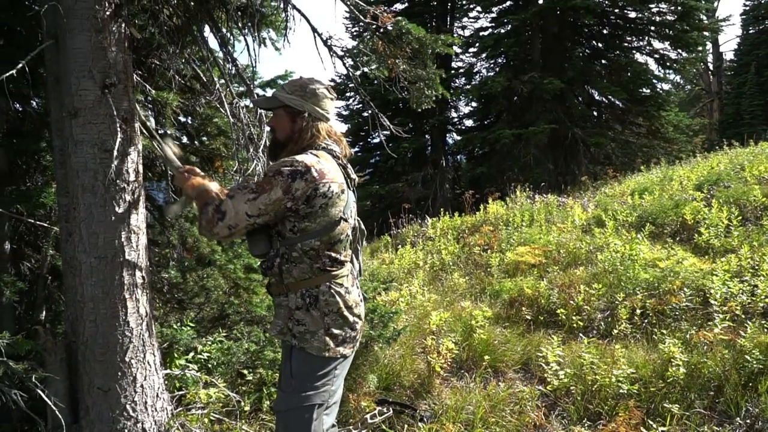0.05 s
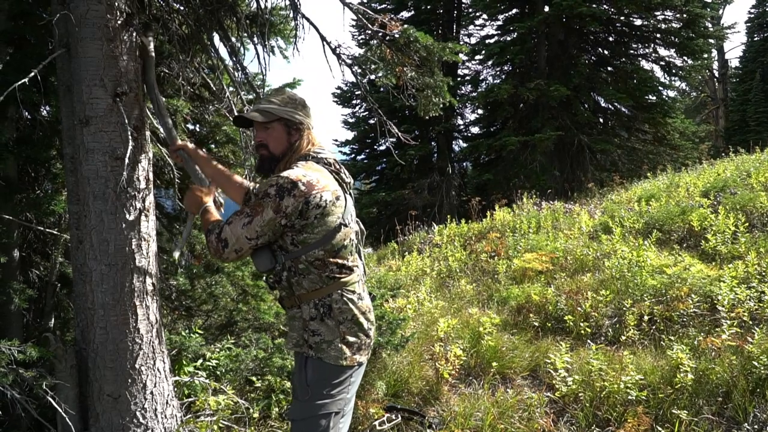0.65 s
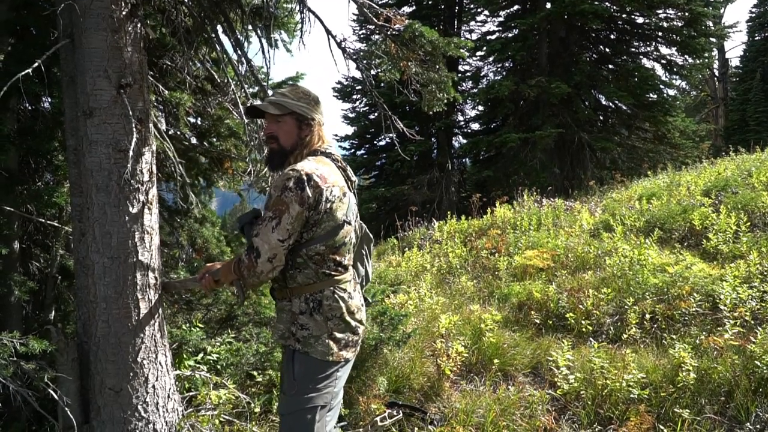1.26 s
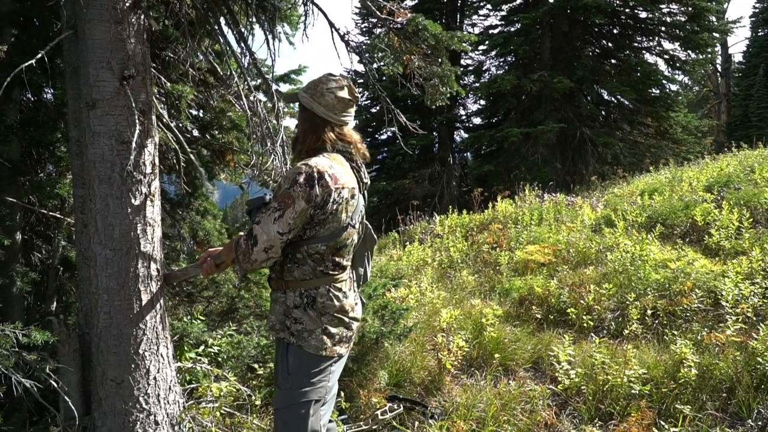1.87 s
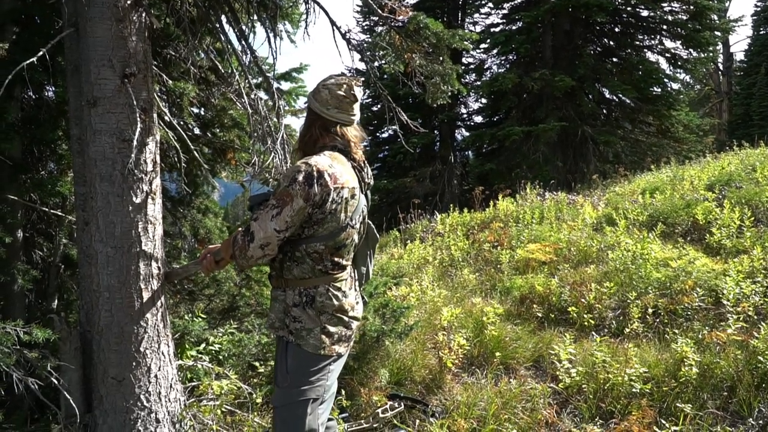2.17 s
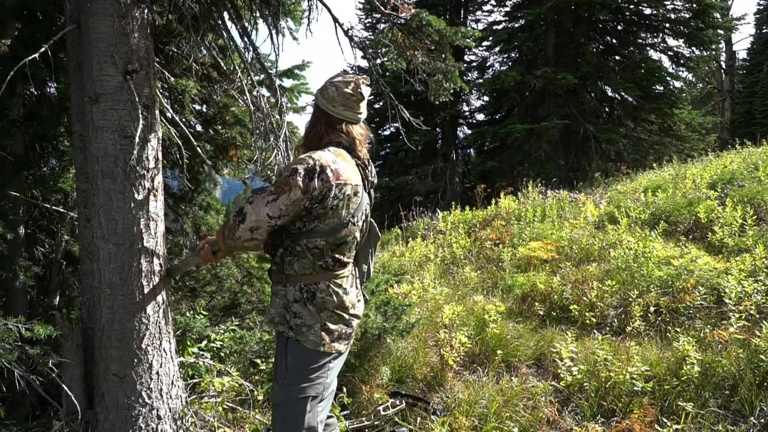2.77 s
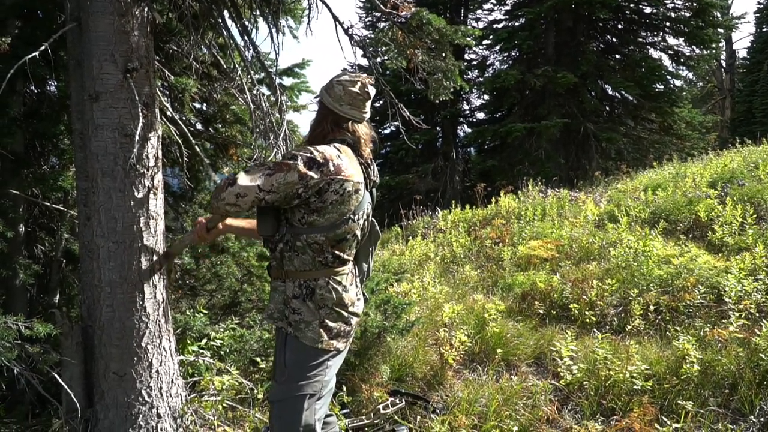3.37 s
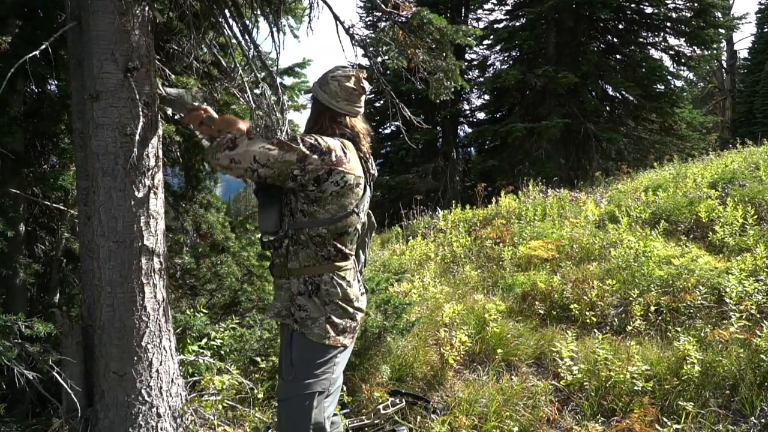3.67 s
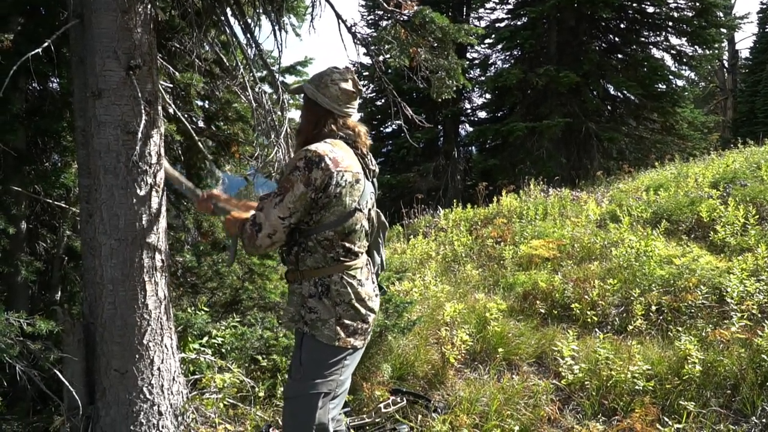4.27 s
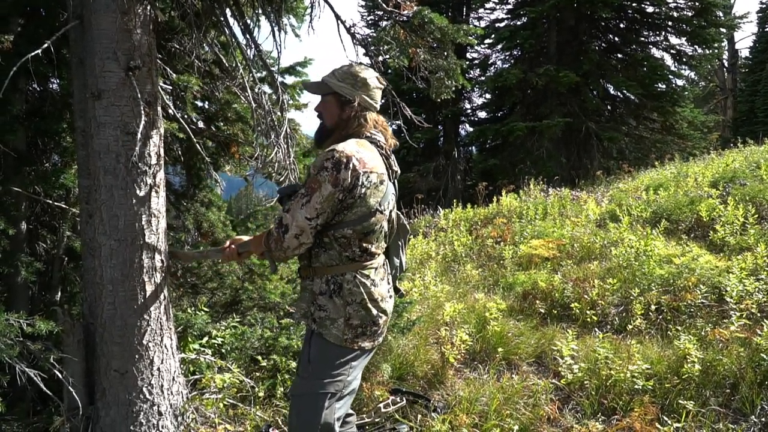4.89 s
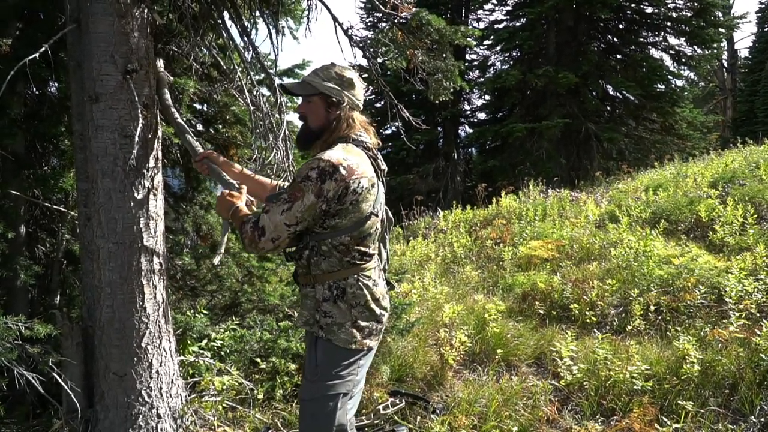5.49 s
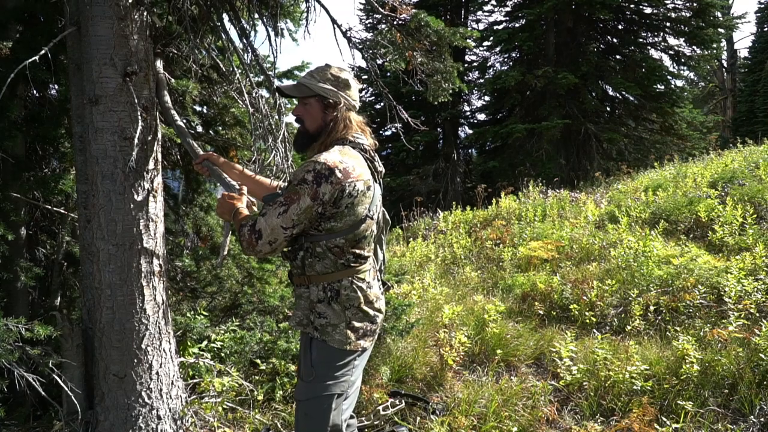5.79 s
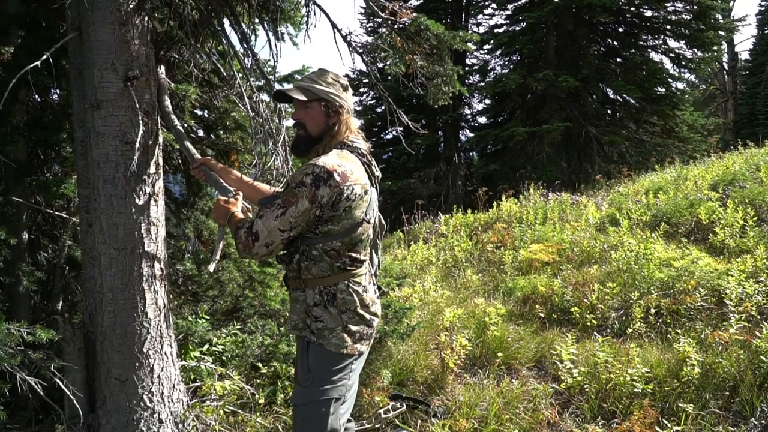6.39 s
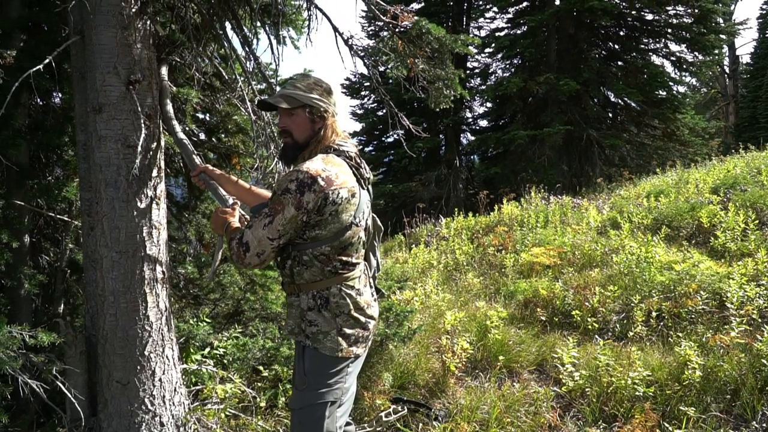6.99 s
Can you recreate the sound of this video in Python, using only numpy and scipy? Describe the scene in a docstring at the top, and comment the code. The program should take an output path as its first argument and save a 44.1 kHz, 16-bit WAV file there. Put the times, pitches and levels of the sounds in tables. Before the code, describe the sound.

A dry stick rasps up and down a tree trunk, crushing bark and snapping small dead twigs. After two loud crackling strokes it eases to light rustling and a wooden knock, then scrapes hard again with a cluster of knocks and ends on a sharp jab. A small bird gives a few faint chips near the end. It is heard from a few metres away in a quiet forest with a soft echo.

```python
"""A faint forest hush and, at once, the rasp of a dry stick raked up and down a conifer trunk.
The stick crushes bark, catches on ridges, snaps dead twigs and is jabbed into the trunk.
Now and then a side knock rings it in the hand, and the trunk shudders under a heavy push.
The trees answer faintly; a small bird gives a few thin chips near the end. Mono, a few metres away."""
import sys
import numpy as np
from scipy import signal
from scipy.fft import rfft, irfft, next_fast_len
from scipy.io import wavfile
from scipy.ndimage import map_coordinates

SR = 44100
rng = np.random.default_rng(int(sys.argv[2]) if len(sys.argv) > 2 else 0)


def log_audio(samples):
    """Write samples as a 16-bit WAV file to the path given in sys.argv[1]."""
    # one column per channel
    frames = np.atleast_2d(samples).T
    # limit to full scale, then quantise
    limited = np.clip(frames, -1, 1)
    pcm = np.round(limited * 32767).astype(np.int16)
    wavfile.write(sys.argv[1], SR, pcm)


N = 319284


def amp(db):
    return 10 ** (np.asarray(db) / 20)


def unit_rms(x):
    return x / np.sqrt(np.mean(x ** 2) + 1e-20)


def curve(points, hz):
    """Interpolate (Hz, value) points on a log frequency axis."""
    point_hz, values = np.transpose(points)
    return np.interp(np.log(hz + 1), np.log(point_hz + 1), values)


def add(track, start_s, x):
    part = track[max(round(start_s * SR), 0):][:len(x)]
    part += x[:len(part)]


def wobble(rate_hz, size):
    """Smooth random curve, rate_hz knots a second."""
    knots = rng.standard_normal(int(size * rate_hz / SR) + 4)
    return map_coordinates(knots, [np.arange(size) * rate_hz / SR])


def filtered(x, gain):
    """Minimum-phase filter with magnitude gain(hz)."""
    n_fft = 2 * next_fast_len(len(x) // 2 + 2048)
    cepstrum = irfft(np.log(np.maximum(gain(np.fft.rfftfreq(n_fft, 1 / SR)), 1e-6)))
    cepstrum[1:n_fft // 2] *= 2
    cepstrum[n_fft // 2 + 1:] = 0
    return irfft(rfft(x, n_fft) * np.exp(rfft(cepstrum)), n_fft)[:len(x)]


def resonance(hz, centre_hz, width_hz):
    return 1 / (1 + (2 * (hz - centre_hz) / width_hz) ** 2)


# Hush spectrum: (frequency [Hz], density [dB])
AIR_SPECTRUM = [(25, -20), (100, -14), (160, -11), (360, -10.5), (670, -8), (920, -9.5), (1240, -12.5),
                (1850, -19), (6000, -25), (11000, -24), (15500, -24)]


def air():
    """Faint, even forest hush."""
    hush = filtered(rng.standard_normal(N), lambda hz: amp(curve(AIR_SPECTRUM, hz)))
    return amp(-66 + 0.4 * wobble(3.6, N)) * unit_rms(hush)


# Breaking bark: (frequency [Hz], density [dB])
BARK_SPECTRUM = [(29, -64), (50, -29), (196, -8.5), (444, -7.5), (551, -5.5), (771, -6.5), (981, -4),
                 (1080, -5.5), (1620, -8.5), (1880, -6.5), (2890, -7), (3670, -6), (5020, -17),
                 (7370, -19.5), (15500, -30)]
# Scraped-stick resonances: (centre [Hz], width [Hz], level [dB])
WOOD_RESONANCES = [(534, 110, -7.5), (977, 60, -7.5), (1286, 54, -6), (1800, 160, -15), (3700, 1600, -14)]


def wood_gain(hz):
    """Colour of breaking bark, heard through the stick."""
    peaks = sum(amp(db) * resonance(hz, centre, width) for centre, width, db in WOOD_RESONANCES)
    return amp(curve(BARK_SPECTRUM, hz)) * (1 + peaks)


def fractures(size):
    """Tiny random breaks in the bark, many small and a few large, over dry hiss."""
    breaking = rng.random(size) < 1300 / SR
    strength_db = 3 * np.minimum(rng.exponential(size=size), 3.5)
    breaks = breaking * rng.choice([-1, 1], size) * amp(strength_db)
    return unit_rms(breaks) + 0.65 * rng.standard_normal(size)


# Slides over bark and needles:
# (start [s], hold [s], level [dB], rise [s per 20 dB], fall [s per 20 dB], body [dB], fizz [dB])
STROKES = [(0.026, 0.063, -49.5, 0.02, .1, -7, -4.5), (0.134, 0.092, -34, .08, 0.16, -8.5, -7),
           (0.354, .34, -56, .1, .2, -2, -3.5), (0.802, 0.24, -38, 0.11, 0.14, -2, -6),
           (1.173, .1, -54, 0.062, .22, 3, -3.5), (1.4, .2, -71, .2, 0.34, 7.5, 2.5),
           (1.848, .1, -65, 0.29, .35, -9, -7.5), (2.152, 0.094, -62, 0.017, .15, -3, -7.5),
           (2.249, 0.15, -75, 0.077, 0.5, 11, 4), (2.6, 0.5, -76, 0.33, 0.41, 1.5, -2),
           (3.393, 0.24, -54.5, .06, 0.098, -7, -3.5), (3.756, 0.039, -36.5, 0.065, .19, -4.5, -2.5),
           (4.09, .08, -55.5, 0.11, .1, 0.5, -3), (4.194, 0.1, -51, .05, .05, 2.5, -22.5),
           (4.374, 0.037, -43, 0.21, 0.3, -6, -0.5), (4.756, 0.53, -69.5, 0.17, 0.082, 4, 3.5),
           (5.26, 0.093, -43.5, 0.11, 0.1, -4.5, -4.5), (5.377, 0.091, -50, .05, .06, 4, -15.5),
           (5.476, 0.14, -67.5, 0.054, 0.5, 9, -1.5), (5.797, 0.49, -77.5, 0.13, 0.16, 5.5, 2)]


def stroke_gains(t, stall_s=0.014, stall_db=-7):
    """Body, crackle and fizz gains: strokes swell, hold, fade, and stall just before a catch."""
    power = np.zeros((3, len(t)))
    for start_s, hold_s, db, rise_s, fall_s, body_db, fizz_db in STROKES:
        fade = np.maximum(start_s - t, 0) / rise_s + np.maximum(t - start_s - hold_s, 0) / fall_s
        envelope = amp(db - 20 * np.minimum(fade, 10))
        power += np.outer(amp([body_db, 0, fizz_db]), envelope) ** 2
    catch_s = np.sort([start_s for start_s, *_ in CATCHES] + [np.inf])
    wait_s = catch_s[np.searchsorted(catch_s, t)] - t
    return np.sqrt(power) * amp(stall_db * np.exp(-(wait_s / stall_s) ** 2))


def rub(clump_db=2, grit_db=0.4):
    """The sliding stick crushes bark in uneven clumps; three bands follow the strokes."""
    crumbs = amp(clump_db * wobble(70, N) + grit_db * wobble(240, N)) * fractures(N)
    edges_hz = [40, 1400, 4600, 20000]
    out = np.zeros(N)
    for gain, low_hz, high_hz in zip(stroke_gains(np.arange(N) / SR), edges_hz, edges_hz[1:]):
        def band_gain(hz):
            return wood_gain(hz) / np.sqrt((1 + (low_hz / (hz + 1)) ** 10) * (1 + (hz / high_hz) ** 10))
        out += gain * unit_rms(filtered(crumbs, band_gain))
    return out


def flakes(count=420, level_db=4.5):
    """Loose flakes and twiglets tick at their own pitches, scaled by the rubbing that shakes them."""
    out, t = np.zeros(N), np.arange(SR // 30) / SR
    times_s = rng.random(count) * N / SR
    for start_s, shake in zip(times_s, stroke_gains(times_s)[1]):
        pitch, size, life = rng.standard_normal(3)
        hz = 1600 * np.exp(0.42 * np.clip(pitch, -2, 2))
        t60_s = 0.047 * np.exp(0.39 * life)
        tick = np.sin(2 * np.pi * hz * t) * amp(level_db + 3 * size - 60 * t / t60_s)
        add(out, start_s, shake * tick)
    return out


def contact(force, ring_hz, ring_db, firm_db, fizz_db):
    """Colour one contact: firmer pressure brings out the low wood and damps the ringing piece."""
    thud_db, hollow_db = 0.81 * firm_db, 0.22 * firm_db
    shape_db = [(280, thud_db), (520, hollow_db), (1100, hollow_db), (1800, 0.0063),
                (3900, 0.37 * fizz_db), (5600, fizz_db), (14000, 1.5 * fizz_db)]
    # each spot on the stick favours other small resonances
    spot_db = 2.8 * rng.standard_normal(60)

    def gain(hz):
        ripple_db = np.interp(hz, np.geomspace(350, 8000, len(spot_db)), spot_db, left=0, right=0)
        piece = amp(ring_db - 0.16 * firm_db) * resonance(hz, ring_hz, 0.23 * ring_hz)
        return wood_gain(hz) * amp(curve(shape_db, hz) + ripple_db) * (1 + piece)
    return unit_rms(filtered(force, gain))


def slips(size, rate_hz=170):
    """Hard slips at uneven intervals."""
    slip_count = np.floor(np.cumsum(rate_hz * np.exp(0.5 * wobble(200, size))) / SR)
    return unit_rms(np.diff(slip_count, prepend=0) * np.exp(0.5 * rng.standard_normal(size)))


# Catches on ridges: (time [s], length [s], level [dB], ring [Hz], firmness [dB], fizz [dB])
CATCHES = [(.037, .012, -43, 1406, -16.5, 2), (0.094, .013, -31.5, 2230, -17, 7),
           (0.11, .026, -29.5, 2380, -9, 8), (.147, .016, -26.5, 616, -8, 6),
           (0.169, 0.017, -23.5, 2270, -5.5, 1), (0.188, .025, -23, 546, 8, -2.5),
           (0.288, .027, -32, 1120, -20, -1), (0.531, 0.03, -44.5, 710, -9.5, -10.5),
           (.808, 0.021, -30, 1040, -5, -7.5), (0.865, 0.035, -33, 2480, -2.5, -9),
           (0.902, 0.021, -21.5, 1020, -16, -11.5), (0.922, 0.021, -19.5, 1270, -13, -11.5),
           (0.967, 0.0092, -26, 1340, 0, -3.5), (0.988, 0.0075, -28, 2300, 6, -1.5),
           (1.023, 0.015, -28, 3980, 3, -3.5), (1.046, .03, -36, 659, -10.5, 6),
           (1.161, 0.011, -44, 2030, -13, 6), (1.201, .011, -41.5, 1250, -13.5, -1.5),
           (3.44, 0.028, -39, 3730, -5.5, 6), (3.469, 0.0089, -35.5, 2200, 13.5, -3),
           (3.5, 0.012, -32, 3920, 10.5, -2), (3.54, 0.018, -36, 504, 9.5, -5.5),
           (3.599, 0.03, -43.5, 730, 10.5, 5), (3.666, .014, -30, 544, 4, 3),
           (3.713, .014, -29.5, 640, 9, -2), (3.728, 0.013, -21, 1900, -1.5, -2),
           (3.743, .014, -24.5, 1990, -2.5, -3.5), (4.26, .014, -34, 1390, -4, -1),
           (4.284, 0.013, -36.5, 1009, 10, 1.5), (4.325, .015, -35, 3624, 9.5, 6),
           (4.351, .024, -32, 990, 10, -4), (4.392, 0.016, -29.5, 4000, 2, -3),
           (4.428, .01, -28, 1230, 8.5, -1.5), (4.451, .012, -29.5, 1930, 13.5, -0.5),
           (4.472, 0.03, -35, 535, 14, -4.5), (4.526, 0.0072, -30.5, 567, 18.5, -2),
           (4.553, .014, -35.5, 3984, -8, 6.5), (4.579, 0.036, -38.5, 3700, -8, 2),
           (5.454, 0.016, -39.5, 650, 23.5, 1), (6.087, .02, -55.5, 5500, -18, 2.5)]


def catches(ring_db=5, slip_db=-4.5):
    """The stick grips, then tears loose in a dense, fading run of slips."""
    out, t = np.zeros(N), np.arange(SR // 10) / SR
    for start_s, length_s, db, ring_hz, firm_db, fizz_db in CATCHES:
        decay_db = -3 * t / length_s - 60 * np.maximum(t - length_s, 0) / 0.039
        envelope = (1 - np.exp(-t / 0.0012)) * amp(decay_db)
        crunch = fractures(len(t)) * amp(1.5 * wobble(260, len(t)))
        judder = crunch + amp(slip_db) * slips(len(t))
        tear = contact(envelope * judder, ring_hz, ring_db, firm_db, fizz_db)
        add(out, start_s, amp(db) * tear * np.sqrt(length_s * SR / len(t)))
    return out


def splinters(count=100, middling_db=-50):
    """Small chance breaks, louder where the stick slides harder; rows as in SNAPS."""
    times_s = (np.arange(count) + rng.random(count)) / count * N / SR
    size, pitch, firmness = np.clip(rng.standard_normal((count, 3)), -2, 2).T
    pressure_db = 20 * np.log10(stroke_gains(times_s)[1]) - middling_db
    db = -44.5 + 0.85 * pressure_db + 5 * size
    return list(zip(times_s, db, 1940 * np.exp(0.45 * pitch), 6 * firmness, np.zeros(count)))


# Breaking twigs and bark: (time [s], relative level [dB], ring [Hz], firmness [dB], fizz [dB])
SNAPS = [(.128, -24.5, 2553, 1, 9), (.1485, -25, 3006, 2, 7.5), (.1787, -26.5, 2480, 0, 2),
         (.1938, -25.5, 599, 4, 1.5), (.22, -26.5, 1936, 0, 10.5), (.3062, -25.5, 1660, -21, -3),
         (.2653, -17.5, 691, 9, -9), (.3918, -41, 1225, -17, 4.5), (.4255, -41, 1800, -15, 0),
         (.5882, -38, 3480, -2, 2), (.6692, -40, 1276, -4, -3), (.7461, -41.5, 4000, -29, 0.5),
         (.8457, -22.5, 3787, -2, 4), (.8682, -29, 2490, 0, -4), (.9027, -13.5, 1184, -11, -11.5),
         (.9296, -17, 1440, -16.5, -11), (1.0906, -28, 2446, -20, 12.5), (1.2447, -35, 1272, -20, 11),
         (1.3782, -53, 1400, 4, -3), (1.8775, -57, 1900, 9, -8), (1.9647, -59, 1900, 3, -8),
         (2.2712, -48, 2460, 9, -12), (2.6942, -55.5, 4070, -3, -6), (2.7745, -53.5, 1690, 11, -10.5),
         (2.838, -55.5, 1790, 17, -6), (2.865, -56.5, 2400, 12, -8), (2.909, -57, 1715, 4, -10),
         (3.3964, -32.5, 3400, -9.5, 5), (3.4978, -26.5, 4040, -1, -5), (3.554, -32, 2120, 12, -4.5),
         (3.7154, -33, 1802, 8, -5), (3.7432, -17, 2110, -6, -2.5), (3.9141, -29.5, 3207, -22, 11),
         (4.244, -30, 1470, -12, -5.5), (4.419, -31.5, 2250, 19, -5), (4.5246, -26, 533, 8, -1),
         (4.5789, -29, 3290, -5, 7), (4.602, -33.5, 2050, 5, -9.5), (4.7718, -48, 1170, -15, 16.5),
         (5.1474, -31.5, 2883, -32, 8), (5.36, -22, 1166, -41, -12), (5.3703, -24, 1378, -16, -12),
         (5.3827, -16.5, 3200, 11.5, 0.5), (5.4189, -30, 2153, 13, -17.5), (5.4497, -27, 1800, 11, 0.5),
         (5.5656, -45.5, 1330, -29, -30), (5.792, -52.5, 3630, 12, 7.5), (6.0475, -43, 5343, -30.5, 6),
         (6.0843, -45.5, 2685, -18.5, 6)]


def snaps(ring_db=9.5, trim_db=-10.5):
    """Each piece breaks with one sharp impulse and a short spray of splinters."""
    out, t = np.zeros(N), np.arange(SR // 20) / SR
    envelope = 0.24 * amp(-60 * t / 0.011) + 0.025 * amp(-60 * t / 0.03)
    for start_s, db, ring_hz, firm_db, fizz_db in list(SNAPS) + splinters():
        force = rng.standard_normal(len(t)) * envelope
        force[0] += 1
        add(out, start_s, amp(db + trim_db) * contact(force, ring_hz, ring_db, firm_db, fizz_db))
    return out


def ring(modes, t, tilt_db_per_oct=0):
    """Damped modes, tilted by the hardness of the blow; hand and bark keep disturbing them."""
    out = np.zeros(len(t))
    for hz, db, t60_s in modes:
        cycles = np.cumsum(hz * (1 + 0.035 * wobble(200, len(t)))) / SR + rng.random()
        level_db = db + tilt_db_per_oct * np.log2(hz / 400) + 1.76 * wobble(150, len(t))
        out += amp(level_db - 60 * t / t60_s) * np.sin(2 * np.pi * cycles)
    return out * (1 - np.exp(-t / 0.00056))


def bass_cut(x, cutoff_hz=105):
    """Deep bass below about 105 Hz is cut from the blows."""
    return filtered(x, lambda hz: 1 / np.sqrt(1 + (cutoff_hz / (hz + 1)) ** 8))


# Stick and trunk pressed together: (frequency [Hz], level [dB], t60 [s])
JAMMED_MODES = [(215.6, -34, 0.048), (332.5, -30, 0.055), (506, -19, 0.016), (519, -25.5, .09),
                (584, -36.5, 0.071), (629, -29.5, 0.091), (1330, -37, 0.022)]
# Tip blows: (time [s], level [dB])
JABS = [(.266, -13), (5.383, 6), (5.451, -14.5)]


def jabs():
    """The tip is rammed home; the stick rings jammed against the trunk."""
    out, t = np.zeros(N), np.arange(SR // 2) / SR
    for start_s, db in JABS:
        add(out, start_s, amp(db) * ring(JAMMED_MODES, t))
    return bass_cut(out)


# Bending modes of the free stick: (frequency [Hz], level [dB], t60 [s])
STICK_MODES = [(112, -31, .08), (146, -24, .17), (230, -34.5, .11), (680, -33, .04), (730, -25.5, .065),
               (1030, -25, .04), (1135, -22, .035), (1320, -20, .015), (2080, -46, .06)]
# Wood striking bark: (frequency [Hz], density [dB])
CLACK_SPECTRUM = [(100, -5.5), (500, -17.5), (1150, 0), (1600, -25), (2050, -3), (2600, -22.5), (3600, -19),
                  (5000, -54), (12000, -53)]
# Side blows: (time [s], level [dB], tilt [dB/octave])
KNOCKS = [(2.1392, 1.5, 0.5), (2.298, -25.5, -4), (2.59, -33, -2), (3.205, -26.5, 1), (3.352, -22, -3.5),
          (3.834, -9.5, 1.5), (3.937, -10.5, 2.5), (3.953, -17, -1.5), (3.965, -11.5, 0.5)]


def knocks(clack_db=-50.5):
    """Side blows ring the whole stick, with a dull clack."""
    out, t = np.zeros(N), np.arange(SR // 2) / SR
    envelope = amp(-60 * t / 0.0083) + 0.11 * amp(-60 * t / 0.54)
    for start_s, db, tilt_db_per_oct in KNOCKS:
        touch = rng.standard_normal(len(t)) * envelope
        clack = unit_rms(filtered(touch, lambda hz: amp(curve(CLACK_SPECTRUM, hz))))
        add(out, start_s, amp(db) * (ring(STICK_MODES, t, tilt_db_per_oct) + amp(clack_db) * clack))
    return bass_cut(out)


# Trunk shudders: (time [s], level [dB])
SHUDDERS = [(2.14, -51), (3.836, -49), (3.948, -49)]


def trunk(t60_s=0.49):
    """A heavy push shakes the trunk: a faint, deep thump."""
    out, t = np.zeros(N), np.arange(SR // 2) / SR
    envelope = (1 - np.exp(-t / 0.004)) * amp(-60 * t / t60_s)
    for start_s, db in SHUDDERS:
        rumble = filtered(rng.standard_normal(len(t)), lambda hz: resonance(hz, 43, 71) ** 2)
        add(out, start_s, amp(db) * envelope * unit_rms(rumble))
    return out


# Bird chips: (peak time [s], pitch [Hz], peak level [dB], Gaussian sigma [s], glide [octaves/s])
CHIPS = [(6.336, 6670, -53, 0.0031, -7), (6.357, 6880, -63, 0.0048, -13), (6.648, 6500, -58.5, 0.004, -5),
         (6.8735, 3740, -38.5, 0.00093, 25), (7.183, 6320, -65, 0.0067, 5)]


def bird():
    """Each chip is one short gliding whistle."""
    out, t = np.zeros(N), np.arange(SR // 10) / SR - 1 / 20
    for peak_s, hz, db, sigma_s, glide_oct_per_s in CHIPS:
        octaves = glide_oct_per_s * t + 0.028 * wobble(490, len(t))
        phase = 2 * np.pi * np.cumsum(hz * 2 ** octaves) / SR
        add(out, peak_s + t[0], amp(db) * np.exp(-(t / sigma_s) ** 2 / 2) * np.sin(phase))
    return out


# Forest tail decay: (frequency [Hz], t60 [s])
FOREST_DECAY = [(100, .7), (900, .6), (3500, 0.47), (12000, .4)]


def forest(x, near_db, edge_db):
    """Near trunks scatter at once; the far edge of the wood returns a soft echo and a long tail."""
    hz, t, noise = signal.stft(rng.standard_normal(SR), SR, nperseg=256)
    hz = hz[:, None]
    near_eq_db = curve([(150, 0), (4000, -6.5), (7000, -2)], hz)
    edge_eq_db = curve([(150, -8.5), (500, -5), (1150, -1.5), (2000, -25.5), (6000, -33)], hz)
    tail_eq_db = curve([(100, -4), (400, 7.5), (1000, -13), (3800, 3), (6000, -9.5), (14000, -12)], hz)
    near = amp(near_db + near_eq_db - 60 * abs(t - 0.03) / 0.057)
    edge = amp(edge_db + edge_eq_db) * np.exp(-((t - 0.235) / 0.026) ** 2)
    tail = amp(tail_eq_db - 60 * t / curve(FOREST_DECAY, hz))
    response = signal.istft(noise * (near + edge + tail), SR, nperseg=256)[1]
    delayed = np.pad(x, (SR // 150, 0))
    return signal.fftconvolve(delayed, response / np.linalg.norm(response))[:N]


def scene():
    """The freely ringing stick radiates sideways into the trees, so its knocks come back strongest."""
    knocking = knocks()
    others = jabs() + rub() + flakes() + catches() + snaps() + trunk() + bird()
    echoes = amp(-19) * forest(others, near_db=14, edge_db=-8.5)
    echoes += amp(-12) * forest(knocking, near_db=17, edge_db=1.5)
    mono = others + knocking + echoes + air()
    return np.array([mono, mono])


def record(dry, hiss_db=-86, top_hz=15900):
    """Independent hiss per channel, then a hard band limit."""
    hiss = amp(hiss_db) * rng.standard_normal(dry.shape)
    n_fft = next_fast_len(N + SR // 10)
    passband = np.fft.rfftfreq(n_fft, 1 / SR) < top_hz
    return irfft(rfft(dry + hiss, n_fft) * passband, n_fft)[:, :N]


dry = scene()
out = record(dry)
log_audio(out)
```